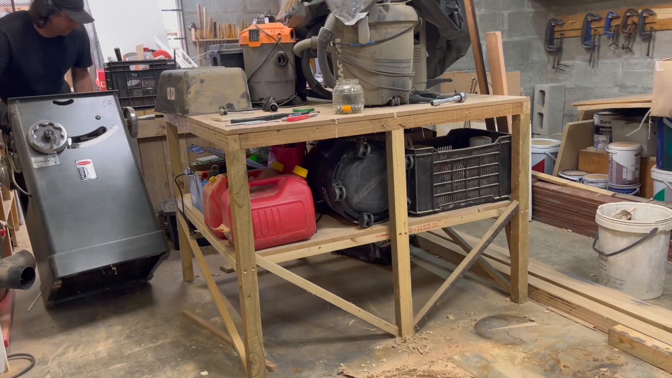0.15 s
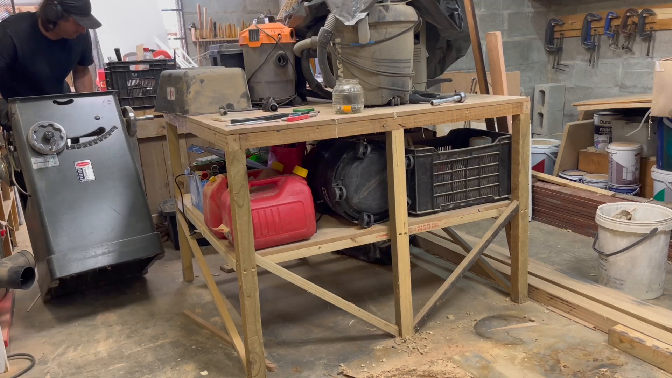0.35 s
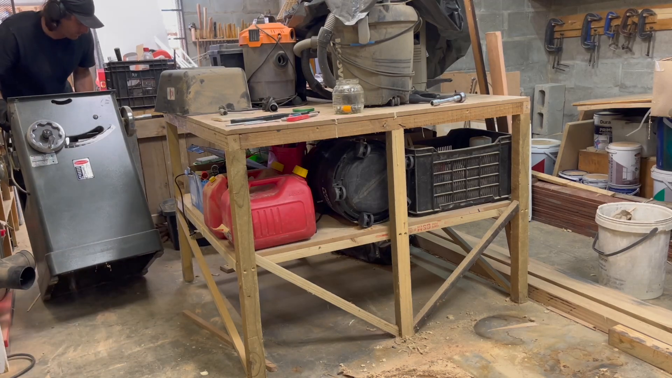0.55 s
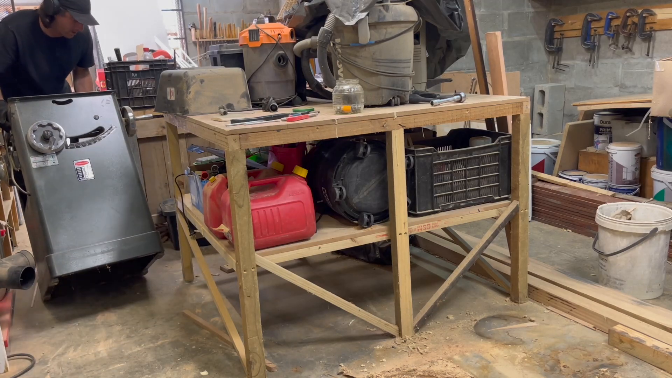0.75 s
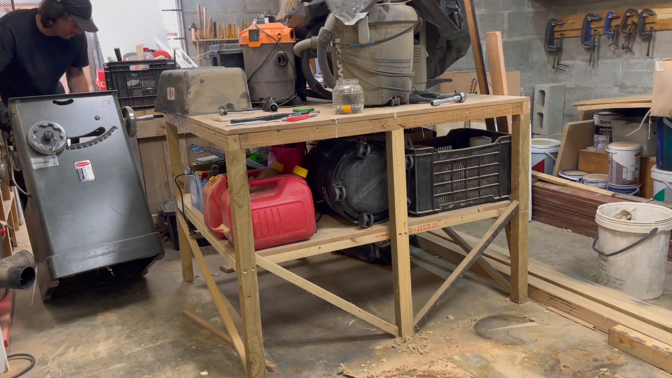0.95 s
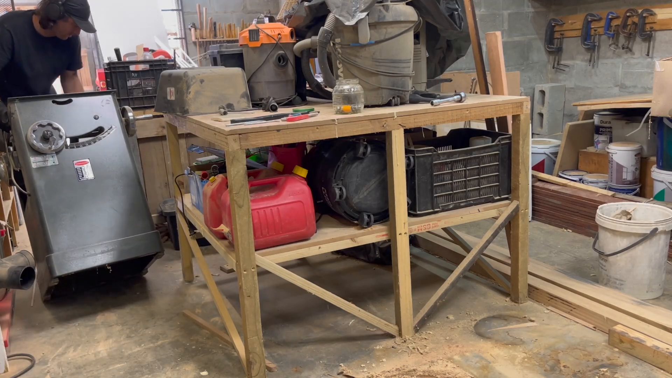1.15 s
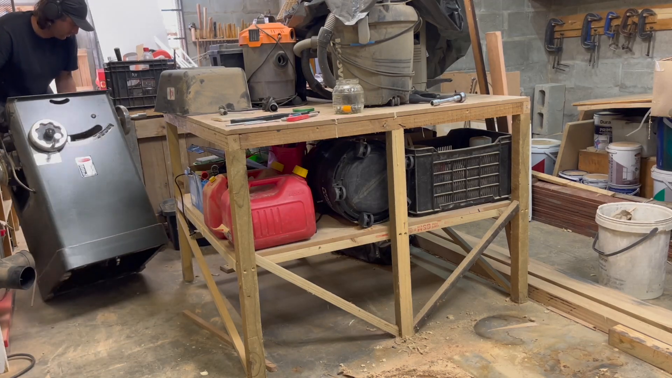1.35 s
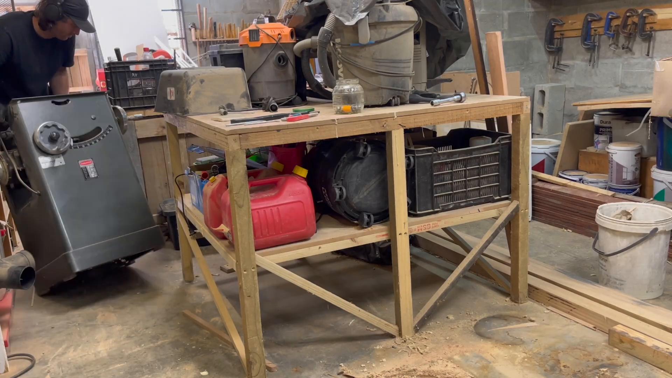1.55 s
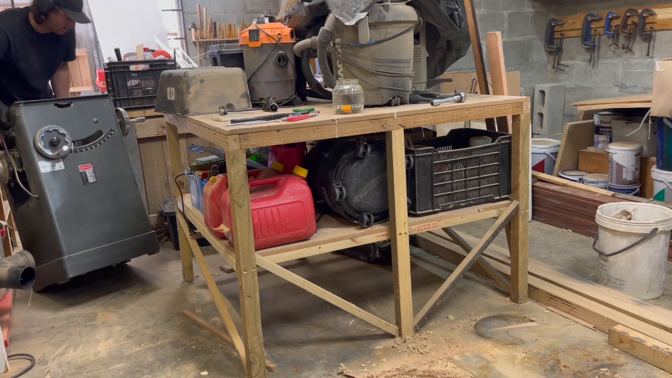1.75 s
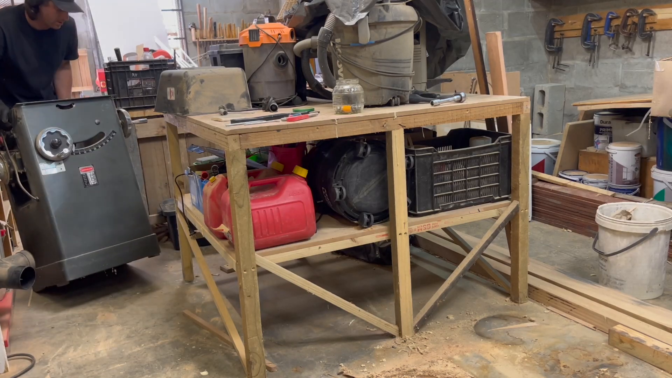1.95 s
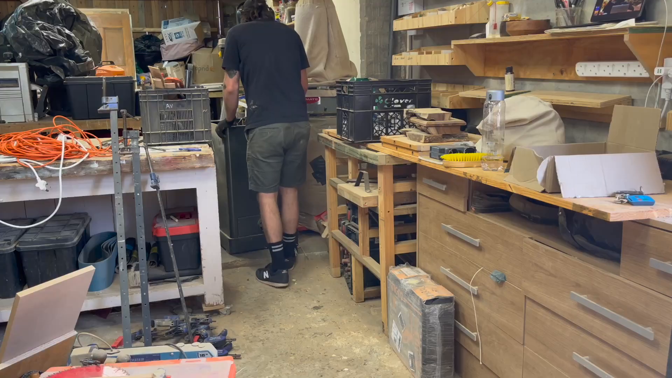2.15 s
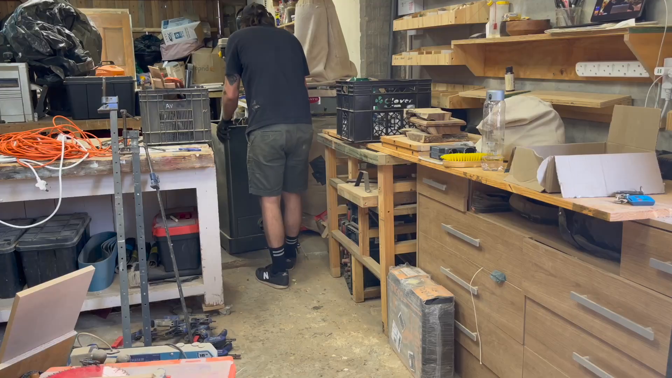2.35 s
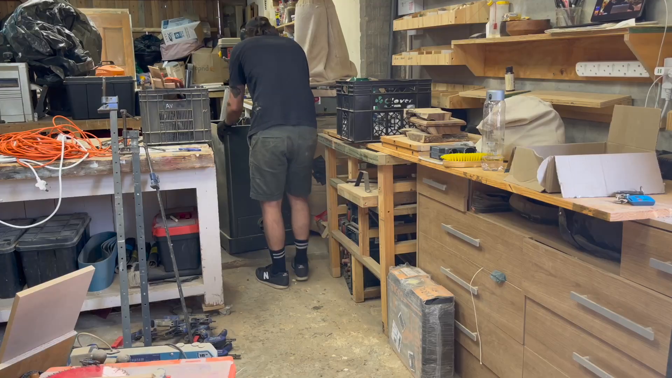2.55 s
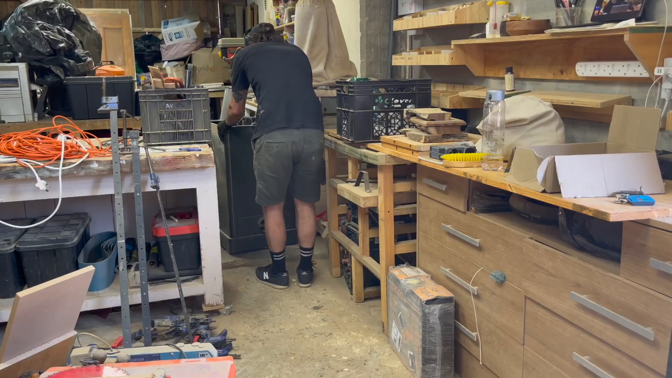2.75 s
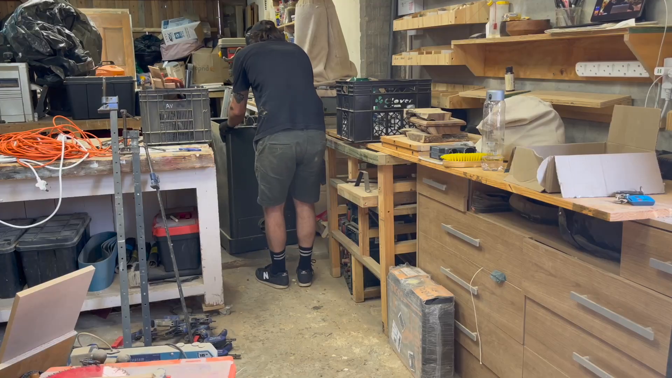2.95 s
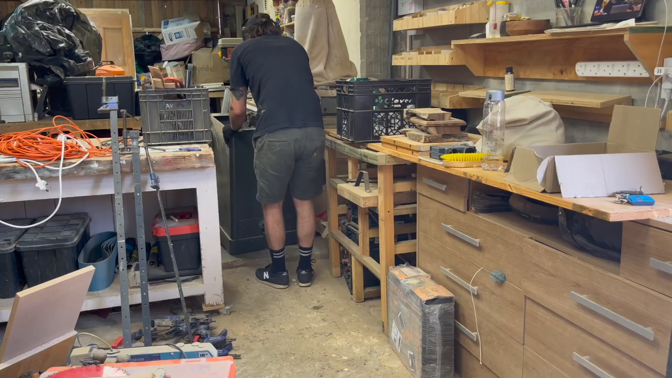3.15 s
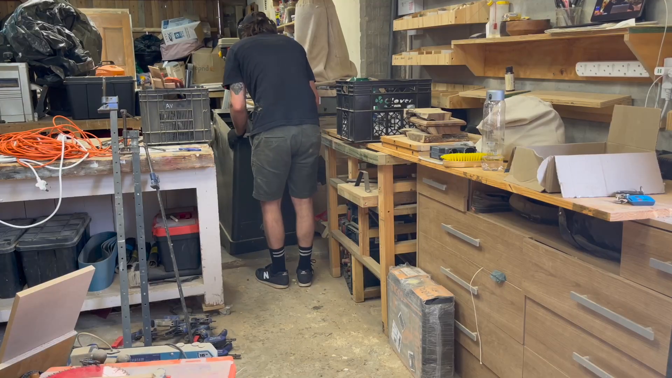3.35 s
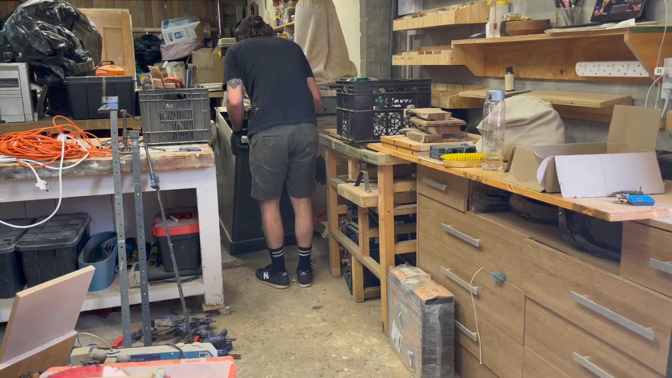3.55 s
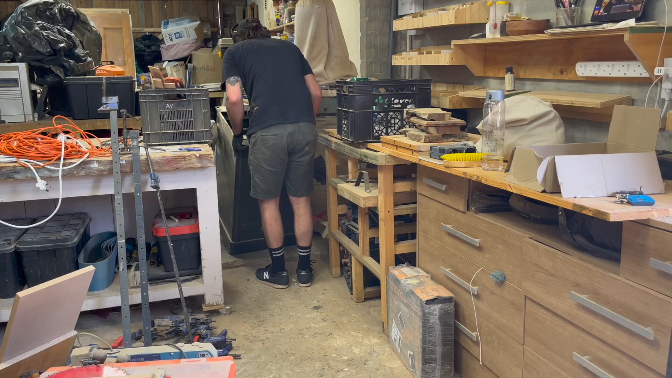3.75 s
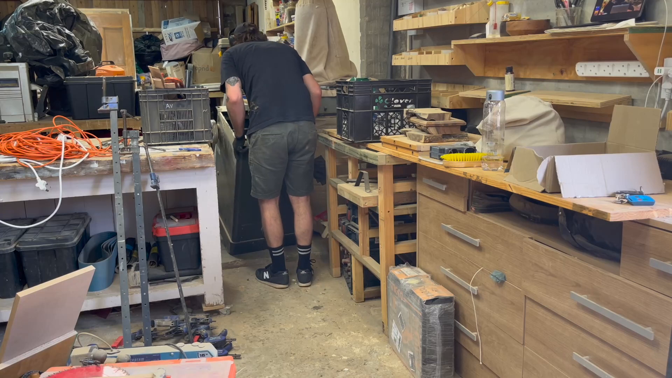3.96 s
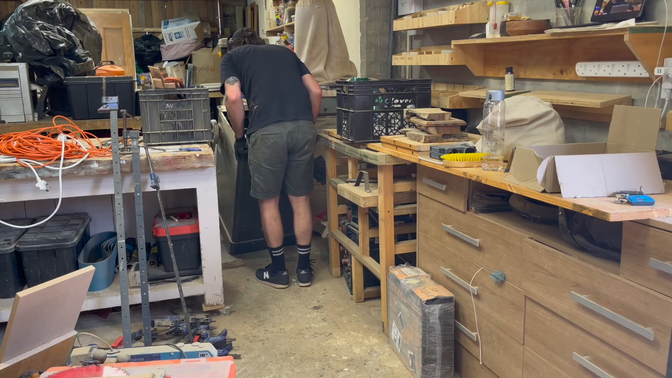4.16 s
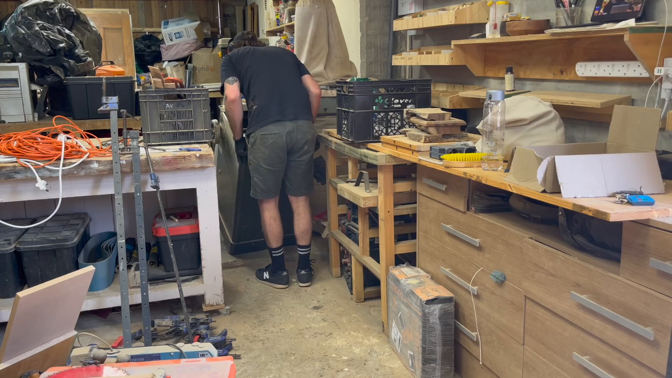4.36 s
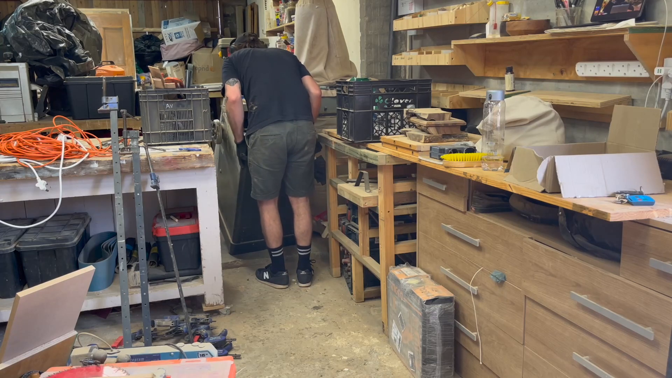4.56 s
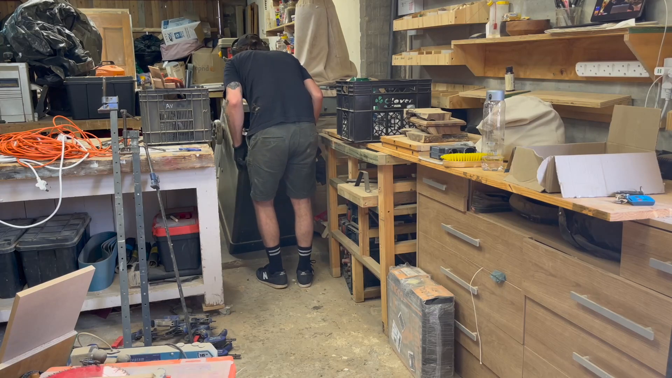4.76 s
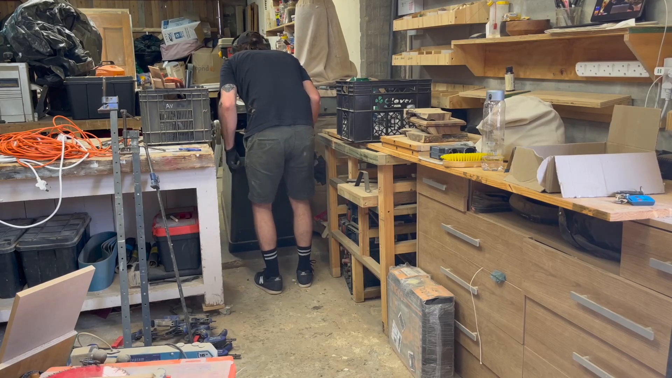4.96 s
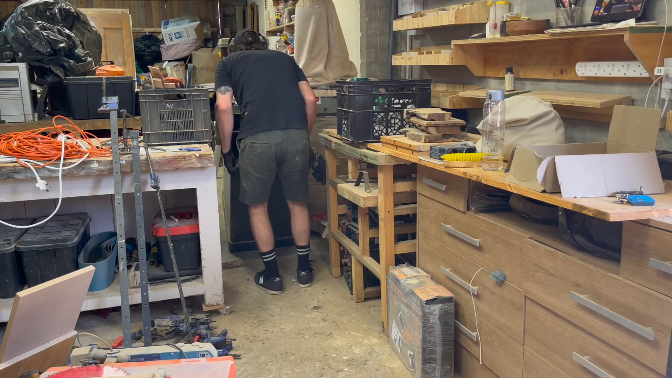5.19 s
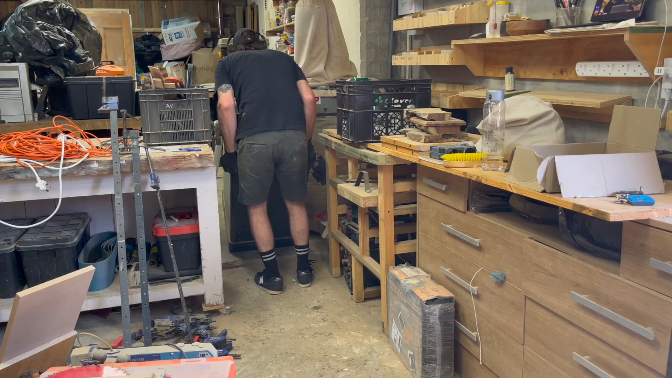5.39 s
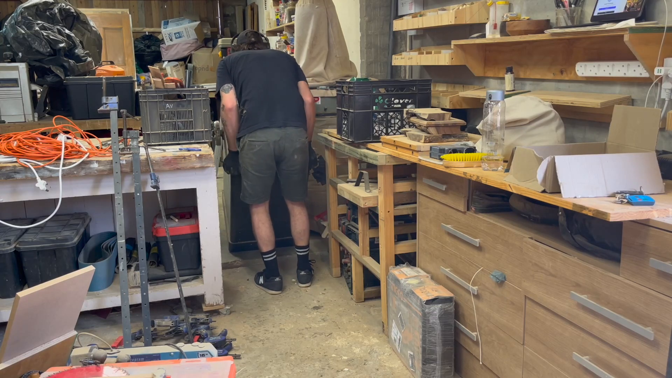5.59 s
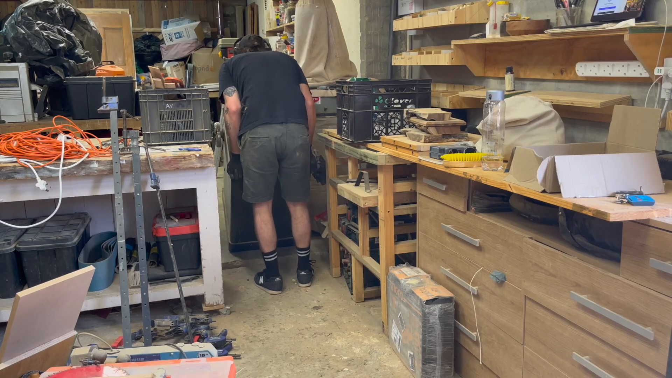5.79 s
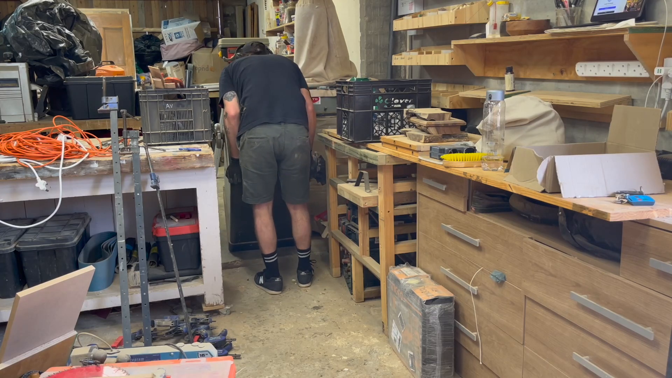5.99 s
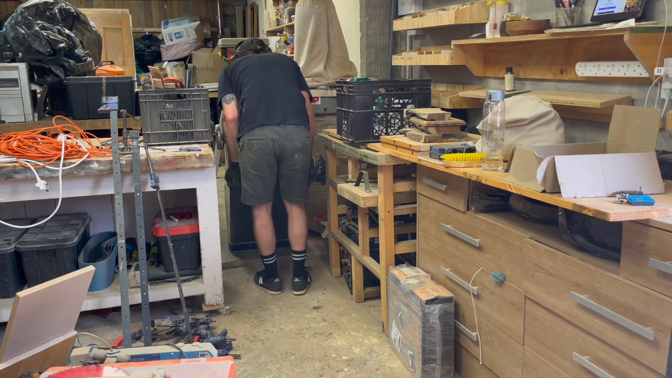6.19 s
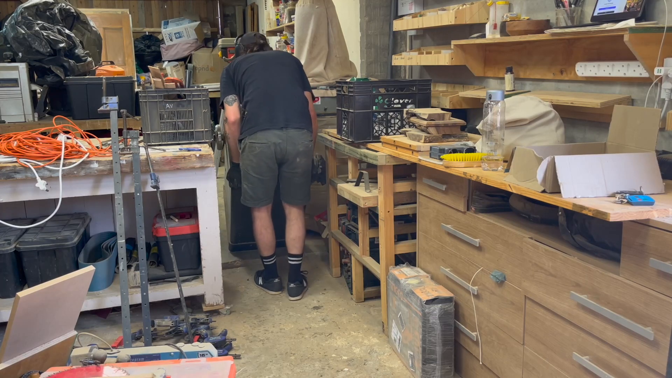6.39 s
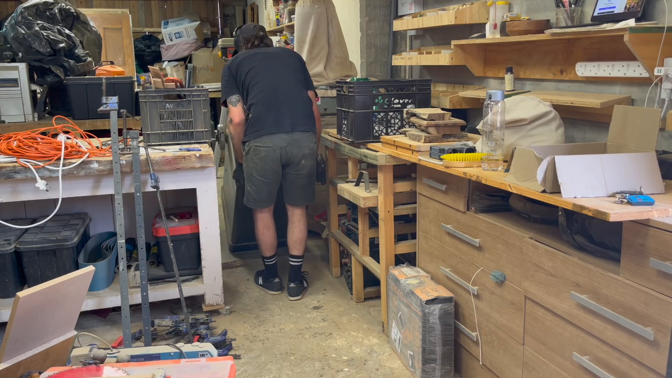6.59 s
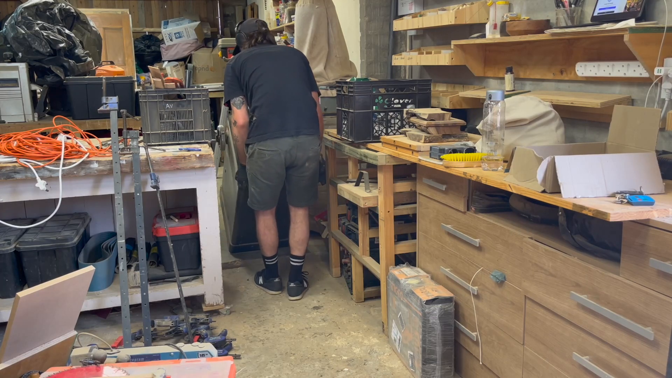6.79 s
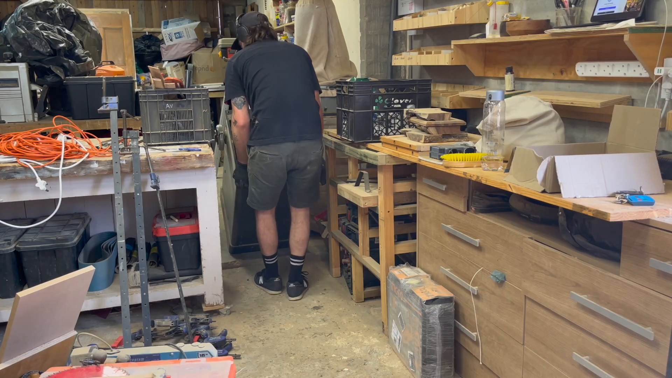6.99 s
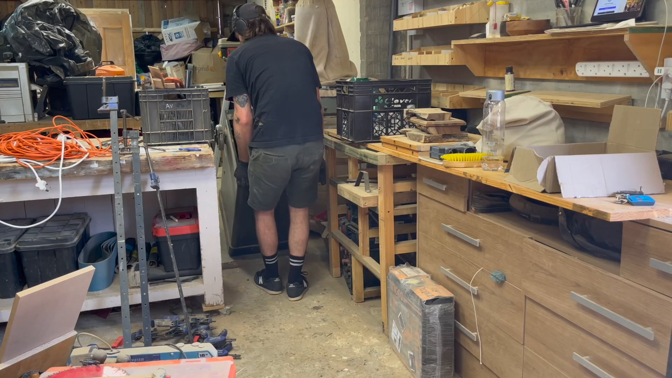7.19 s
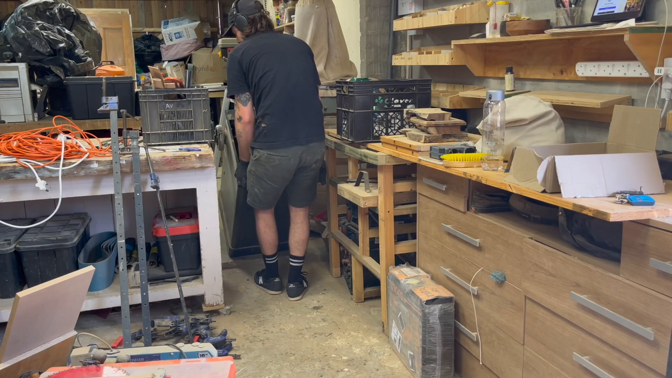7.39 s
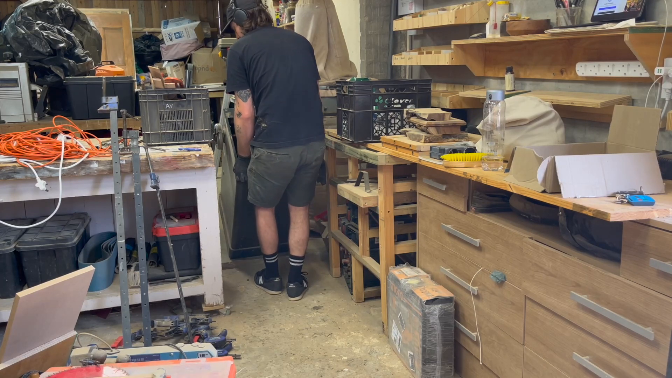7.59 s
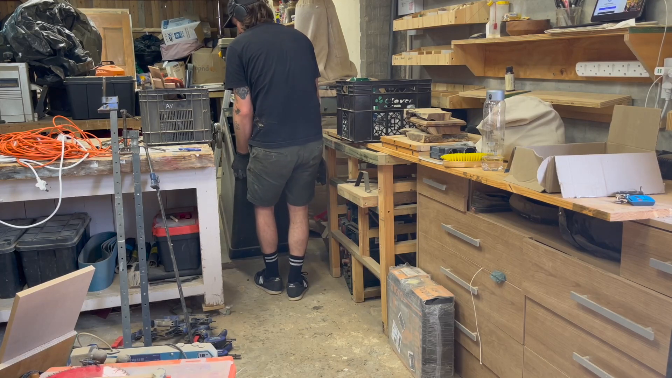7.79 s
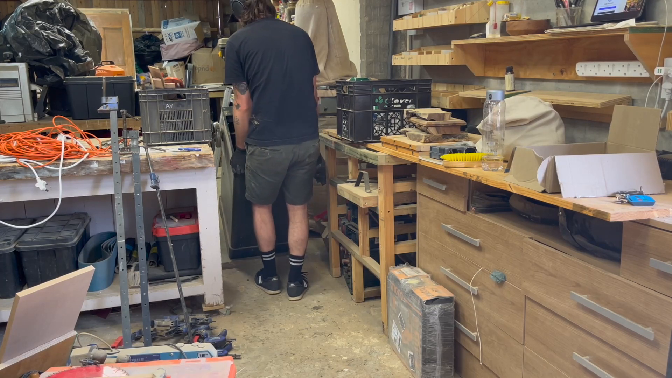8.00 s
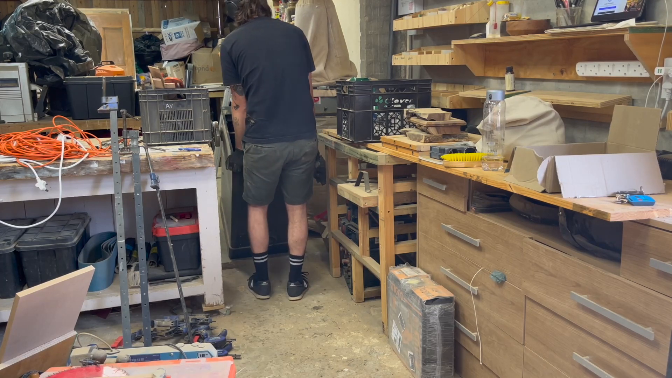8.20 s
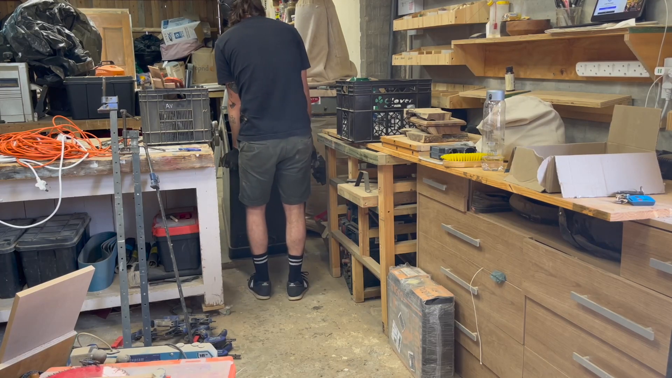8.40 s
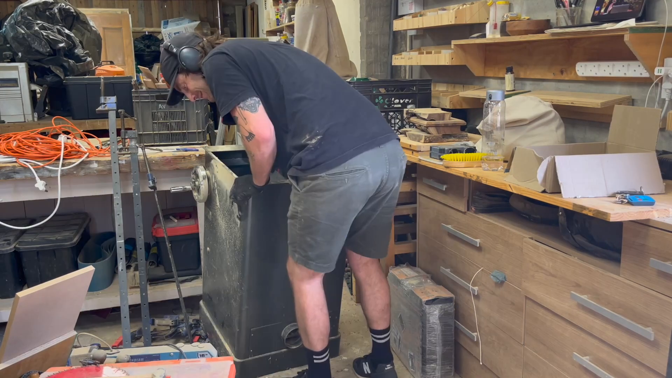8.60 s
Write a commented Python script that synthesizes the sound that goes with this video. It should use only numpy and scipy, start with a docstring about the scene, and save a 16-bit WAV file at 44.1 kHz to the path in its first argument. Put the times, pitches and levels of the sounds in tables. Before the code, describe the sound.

In a small workshop with a short hard echo, two very loud metallic drags on concrete come first, booming, raspy and squealing. After about two seconds everything is much quieter and more distant: a hard clack, a dull thud with shudder, light scrapes, gritty shoe twists, small knocks and cracks, and a last group of scrapes cut off abruptly. Low hum and quiet air lie behind.

```python
"""First, close to the microphone pair, two loud shoves drag a heavy steel-cabinet table saw over concrete.
Then, from further off in the workshop, it is knocked and walked into place in short scrapes, with clacks,
cracking grit and shuffling soles. Random catches of the base excite the cabinet resonances; sines make the
groans, squeals and chirps; short noise bursts make the knocks. A low hum and quiet air lie behind the far place."""
import sys
import numpy as np
from scipy import signal
from scipy.fft import rfft, irfft, next_fast_len
from scipy.io import wavfile
from scipy.ndimage import uniform_filter1d, map_coordinates

SR = 44100
rng = np.random.default_rng(int(sys.argv[2]) if len(sys.argv) > 2 else 0)


def transcribe(u):
    """Save the signal u as a 16-bit wav file named by the first command-line argument.

    u: samples, shape (n,) or (channels, n), limited to [-1, 1]; the rate is SR.
    q: integer samples, one column per channel.
    """
    v = np.clip(np.atleast_2d(u).T, -1, 1)
    q = np.round(v * 32767).astype(np.int16)
    wavfile.write(sys.argv[1], SR, q)


N = 381015
TIME = np.arange(N) / SR  # s
STEPS = np.arange(0, N / SR, .001)  # s, coarse time for envelopes
SIZE = next_fast_len(N + SR)  # transform length with room for tails
HZ = np.fft.rfftfreq(SIZE, 1 / SR)

# Shoves close by, and one gritty shoe scuff at .59 s: (start t/s, rise/s, hold/s, fade to -60 dB/s,
# then level/dB of rumble, panel ring, edge rasp, grit, settling shudder)
NEAR_SHOVES = [(-0.021, 0.01768, 0.06221, 0.5, -27.5, -23, -32.5, -41, -58),
               (.052, .06, 0.13049, 0.7088, -30, -24.5, -24, -32.5, -42.5),
               (.25, .05, 0.05991, .5, -28.5, -25.5, -28, -39, -42),
               (.59, 0.12841, 0.06, 0.5257, -52.5, -66, -56.5, -50, -58),
               (1.253, 0.22, 0.04, 0.5412, -52, -35, -33, -41, -59.5),
               (1.426, 0.15688, 0.10867, 0.5748, -38, -28, -26, -36.5, -31),
               (1.57, .05, .025, .3, -42, -34, -25.5, -36, -45)]
# Shoves further off: (the same columns, t/s and level/dB)
FAR_SHOVES = [(3.385, 0.023755, 0.05111, 0.4025, -40, -56.5, -62, -68, -54),
              (3.485, 0.05, 0.05, 0.8, -44, -55, -63, -67.5, -46),
              (4.66, 0.19, 0.135, 0.6427, -46, -47.5, -50.5, -62, -51),
              (6.861, 0.083, 0.163, 1.5, -47, -47.5, -47, -53.5, -57),
              (7.091, .093, .115, 0.62, -48.5, -44, -44.5, -51.5, -56.5),
              (7.39, .125, .053, 0.8291, -55, -43, -46, -55, -39.5),
              (8.133, 0.09965, 0.0268, 3, -57.5, -58, -59, -57, -59.5),
              (8.3, .22, .065, .5, -48, -46, -47.5, -55, -53)]
# Growth of rumble, panel ring, edge rasp and grit: (dB per dB of push)
BAND_GROWTH = [.62, 1.0, 1.38, 1.42]
# Settling shudder in rumble, panel ring, edge rasp and grit: (relative level/dB)
NEAR_SETTLE_DB = [1, -22.5, -44.5, -35]
FAR_SETTLE_DB = [-0.5, -49, -50, -43.5]
# Edges of those four bands, of which the inner three divide the sound: (f/Hz)
BAND_EDGES = [20, 200, 650, 2500, 11000]
# Cabinet resonances at each place: (f/Hz, width/Hz, level over the slope/dB)
NEAR_MODES = [(78.664, 6.2, 16.5), (145.47, 35, 14), (207, 14, 13), (263.48, 12, 13), (304.72, 6.1, 17),
              (374.6, 15, 12.5), (388.47, 13, 12.5), (447.5, 13, 18), (536.54, 19, 10.5),
              (624.65, 19, 12.5), (758.65, 7.8, 11), (812.86, 14, 13), (897.31, 13, 8.5), (1014.1, 31, 8),
              (1103.6, 14, 9), (1298.7, 28, 10.5), (1650, 30, 7), (2054, 7.1, 5), (2154, 53, 2),
              (4950, 700, 4.5), (7351, 260, 5)]
FAR_MODES = [(148.73, 16.51, 12.233), (216.43, 15.7, 8.016), (325.43, 9.92, 6.66), (398.67, 37.24, 6.137),
             (480.81, 16, 11), (552.46, 18, 12.5), (651.46, 33.64, 4.771), (767.77, 16.71, 11.47),
             (847.2, 15.25, 10.554), (1165.8, 75.66, 7.22), (1345.6, 6.004, 15.891), (1979.3, 28.24, 7.573),
             (4119.7, 89.585, 5.3), (4750, 110, 12.5), (5036.3, 250, 4.4)]
CORNER_MODES = [(145, 26, 13), (212.88, 22, 12), (304.31, 19.94, 11), (331.98, 16, 9), (485.64, 35.09, 7.8),
                (559.32, 30, 9.407), (631.04, 25, 6.6), (748.41, 28.33, 13), (1077, 23.76, 9.364),
                (1270.6, 90, 7), (4800, 390, 2.5)]  # far place, tipped on one corner
# Smooth colour of the scrape under the resonances: (f/Hz, relative level/dB)
NEAR_SLOPE = [(22.0, -42), (50.0, -12), (110.0, -23.5), (235.0, -25.5), (330.0, -16.5), (800.0, -21),
              (1500.0, -16.5), (1900.0, -27), (3500.0, -34.5), (6300.0, -40.5), (8500.0, -40),
              (15000.0, -57)]
FAR_SLOPE = [(22, -32), (52, 5.5), (110, -8.5), (235, -16), (330, -9.5), (800, -19), (1500, -20.5),
             (1900, -25), (3500, -32), (6300, -34.5), (8500, -35), (11000, -39.5), (15000, -50)]
# Steel edge groaning: (start t/s, rise/s, hold/s, fade to -60 dB/s, level/dB)
CHATTER = [(1.283, .013, .06, .15, -31), (1.385, .03, .05, .4, -25), (1.525, .03, .1, .09, -17.5)]
# Friction sets a resonance singing: (centre t/s, length/s, f/Hz, level/dB)
SQUEALS = [(.015, .035, 400, -16), (.07, .06, 362.4, -21), (.116, .025, 445, -18), (.148, .028, 430, -17),
           (.135, .03, 1320, -25), (.202, .02288, 420.5, -19.5), (.255, .06, 1315, -22),
           (.315, .02, 1325, -24), (.364, .02465, 451, -16.5), (1.462, .025, 1319, -24.5),
           (1.491, .03692, 140, -28), (1.5, .024, 1304, -18), (1.503, .016, 445, -21),
           (1.72, .04, 650, -26), (1.74, .07, 1640, -34), (3.492, .07505, 143, -34.5),
           (3.622, .05037, 145, -34), (4.895, .2121, 148.2, -40.5), (6.11, .05, 1200, -50),
           (7.203, .1756, 472, -36.5), (7.3, .0665, 545, -39.5), (8.465, .05, 550, -42),
           (8.54, .05, 400, -42)]
# Cabinet rocks without sliding: (start t/s, rise/s, hold/s, fade to -60 dB/s, level/dB)
ROCKING = [(3.715, .02, 0.07402, 0.0028, -43.5), (6.25, 0.1528, 0.05294, 0.7, -43)]

# Hard clacks and bursting grit, with a click at 8.58 s as the handling is cut short:
# (t/s, level/dB, decay to -60 dB/s)
CLACKS = [(1.211, -58, .0553), (1.232, -45, .1598), (2.411, -46.5, .03), (2.47, -52, .04),
          (2.629, -28.5, .11), (2.652, -37, .05), (4.918, -39.5, .0347), (6.062, -47, .025),
          (6.178, -37.5, .025), (6.228, -41, .02452), (6.34, -38.5, .04), (6.395, -44, .0274),
          (6.576, -36.5, .04), (8.092, -47, .02872), (8.216, -42.5, .1142), (8.58, -33.5, .01273)]
# Colour of a clack: (f/Hz, relative level/dB)
CLACK_SLOPE = [(100, -17), (400, -7), (900, -2), (1500, -2), (3000, -5), (5500, -7), (9000, -12.5),
               (11000, -20.5), (15000, -31.5)]
# Resonances of a clack: (f/Hz, width/Hz, level over the slope/dB)
CLACK_MODES = [(1600, 400, 1.5), (2250, 700, 0), (5100, 510, 3)]
# Single grains cracking under the steel: (t/s, level/dB)
CRACKS = [(4.772, -38), (4.848, -35), (5.022, -37), (5.057, -41), (6.477, -46), (7.04, -40), (7.12, -39),
          (7.815, -48), (8.152, -41), (8.263, -43), (8.523, -41)]
# Colour of a crack: (f/Hz, relative level/dB)
CRACK_SLOPE = [(200, -14), (2000, -6), (6500, -9), (9000, -6.5), (15000, -28)]
# Resonance of a crack: (f/Hz, width/Hz, level over the slope/dB)
CRACK_MODES = [(4850, 300, 11)]
# Dull thuds; the one at 8.579 s is a click at the cut: (t/s, level/dB, decay to -60 dB/s)
THUDS = [(3.39, -24.5, .035), (3.445, -37, 0.0317), (3.585, -42.5, 0.055), (6.578, -39.5, .1),
         (6.872, -50, .03), (6.892, -43, .04), (8.091, -38, .035), (8.579, -17, .012)]
# Colour of a thud: (f/Hz, relative level/dB)
THUD_SLOPE = [(25, -30), (55, -4), (110, -4.5), (235, -7.5), (330, -4), (450, -7), (600, -3), (850, -9),
              (1300, -26), (3000, -36), (10000, -48)]
# A loose steel part clinks: (t/s, level/dB, decay to -60 dB/s)
CLINKS = [(4.391, -39.5, .26), (6.064, -52, .2), (6.342, -48, .15)]
# Colour of a clink: (f/Hz, relative level/dB)
CLINK_SLOPE = [(100, -10), (500, -3.5), (1200, -4.5), (2500, -6.5), (6000, -16), (11000, -21), (15000, -23)]
# Resonances of the loose part: (f/Hz, width/Hz, level over the slope/dB)
CLINK_MODES = [(490, 30, 4), (940, 45, 19.5), (1020, 50, 20), (1233.5, 45, 12), (1351, 45, 16.5),
               (2700, 110, 3), (4800, 110, 17), (8400, 900, 5.717)]

# Shoes shuffle and clothes rustle; a sole twists hard on grit:
# (start t/s, rise/s, hold/s, fade to -60 dB/s, level/dB)
SHUFFLES = [(1.08, .02, .08, 0.2262, -78), (2.11, 0.014, 0.07348, 2.0444, -62.5),
            (2.4, 0.013, 0.04967, 0.5086, -56.5), (3.89, .067, .055, .86, -76),
            (5.02, 0.43716, .02, 0.6586, -62.5), (5.5, 0.1786, 0.10797, 2.5, -61.5),
            (7.795, .025, 0.00523, 0.6769, -56.5), (7.86, 0.044, 0.00985, 2.3812, -64.5)]
SCUFFS = [(6.052, .024, 0.0595, .8, -50), (6.135, 0.04236, 0.0288, 0.4374, -39.5),
          (6.21, 0.03053, 0.01965, 0.2005, -44.5), (6.337, .03, .035, .35, -44)]
# Colour of shuffle and of twist: (f/Hz, relative level/dB)
SHUFFLE_SLOPE = [(150, 0), (400, -1.5), (1400, -2), (1900, -5.5), (4500, -6), (7000, -12.5), (11000, -17),
                 (15000, -28.5)]
SCUFF_SLOPE = [(100, -14), (250, -13), (400, -4), (750, 0), (1400, -1.5), (1700, -6.5), (2200, -5.5),
               (5000, -14), (8500, -19), (11000, -24), (15000, -30.5)]
# A rubber sole squeaks: (centre t/s, length/s, f/Hz, level/dB)
SQUEAKS = [(5.39, 0.08074, 2300, -69), (5.75, .07, 2800, -67.5), (6.536, 0.0157, 1693, -57.5)]

# Low hum, before the trim of each channel: (t/s, f/Hz, level/dB)
HUM = [(2.125, 66.99, -44), (2.9, 70.3, -46.5), (3.9, 71, -50), (4.4, 77.64, -60), (6.2, 78.83, -61)]
# Colour of the still air: (f/Hz, relative level/dB)
AIR_SLOPE = [(25, -27), (55, -3.5), (90, -4), (120, -13.5), (165, -13.5), (240, -21), (400, -26.5),
             (1500, -36), (2300, -44.5), (5000, -48), (15000, -69)]
# Decay of the workshop: (f/Hz, t60/s)
ROOM_DECAY = [(100, 0.52), (800, 0.2), (2100, .27), (5500, .235), (14000, 0.25)]
# Likeness of the two microphones: (f/Hz, correlation)
ALIKE = [(60, .99), (170, .94), (330, .72), (520, .72), (900, .35), (1550, .25), (2050, .82), (2700, .55),
         (3700, .3), (5800, .35), (7500, .75), (8500, .97), (9800, .97), (10700, .6), (11900, .98),
         (13600, .98), (14400, .5), (15300, .85)]
# How each place reaches the pair: (f/Hz, left minus right level/dB, left leads/rad)
NEAR_SIDE = [(60, -4, 0), (170, -4, .2), (340, -2.5, .8), (690, 2, 1), (1380, 2.3, 2), (1750, 1.5, 5.6),
             (2200, 2, 6.7), (2800, .5, 7.6), (3600, 3, 7.9), (4300, 7, 6.2), (5300, 3, 6), (5900, 1, 4),
             (6800, 0, 3.2), (7500, -1, 1.2), (8350, 0, 0), (10000, 0, 0), (11700, 0, -3.1),
             (14000, 0, -3.1), (15000, 0, -6.3)]
FAR_SIDE = [(60, -6.5, .3), (348, -3.8, .1), (840, .3, 1.1), (1300, 1, .7), (1600, 1.5, -.4),
            (2300, .5, .3), (3700, 2.5, 1), (5000, 6, .2), (6440, 2, -2.7), (7300, -1.5, -4.8),
            (8400, 0, -6.3), (9700, 0, -6.3), (12000, 0, -9.4), (13600, 0, -9.4), (15000, 0, -12.5)]

RISE_DB = 21.5  # a push builds up by this much, quickly at first
SETTLE_RISE_S, SETTLE_FADE_S = 0.11, 1.7  # shudder after each push
CHATTER_HZ = 443.6  # slips a second
CRACK_S = .025  # decay to -60 dB
MOVE_S, FLAT_S = 2.125, 5.4  # listening place becomes far; base slides flat
CUT_S, CUT_DB = 8.583, 16  # the handling is cut short, and the drop in level
TOP_HZ = 15600  # band limit


def near_drag():
    """Close by: shoves on the full edge of the base and a gritty scuff, all from dense catches on concrete."""
    force = catches(rate=7000, scatter_db=2, judder_db=1.3, judder_rate=170)
    force = wander(force, depth_db=2.9, grain_hz=60, rate=20)
    cabinet = filtered(force, body(NEAR_SLOPE, NEAR_MODES))
    levels = shove_levels(NEAR_SHOVES, NEAR_SETTLE_DB)
    return (1 - moved()) * drag(levels, cabinet, NEAR_SIDE, wet_db=7)


def far_drag():
    """Further off: lighter scrapes, tipped on one corner, which rings differently, then flat on the base."""
    force = catches(rate=4500, scatter_db=1.8, judder_db=0.6263, judder_rate=51)
    force = wander(force, depth_db=3, grain_hz=70, rate=21)
    # on the corner, the deepest shudder is lost after 4.4 s
    lifted = filtered(force, 1 / (1 + (105 / (HZ + 1)) ** 3))
    corner_force = np.where(TIME > 4.4, lifted, force)
    corner = filtered(corner_force, body(FAR_SLOPE, CORNER_MODES))
    flat = filtered(force, body(FAR_SLOPE, FAR_MODES))
    cabinet = np.where(TIME < FLAT_S, corner, flat)
    levels = shove_levels(FAR_SHOVES, FAR_SETTLE_DB)
    return drag(levels, cabinet, FAR_SIDE, wet_db=7.5)


def drag(levels, dry, side, wet_db):
    """Friction rings the cabinet, shared by the push among rumble, panels, edge and grit."""
    treble = 1 / (1 + (1500 / (HZ + 1)) ** 4)
    # as the cabinet travels, two patterns of reflections trade places 2.3 times a second
    shift = (1 + np.sin(2 * np.pi * 2.3 * TIME)) / 2
    echoing = np.sqrt(shift) * room(dry, wet_db) + np.sqrt(1 - shift) * room(dry, wet_db)
    # the bass stays dry
    mixed = dry + filtered(echoing - dry, treble)
    ring = rfft(spread(mixed, side), SIZE)
    below = [0] + [1 / (1 + (HZ / hz) ** 8) for hz in BAND_EDGES[1:-1]] + [1]
    out = 0
    for k, level in enumerate(levels):
        band_gain = np.sqrt(np.abs(below[k + 1] - below[k]))
        part = irfft(ring * band_gain, SIZE)[:, :N]
        # the steady push evens out the friction over a few judders
        power = uniform_filter1d(part.mean(0) ** 2, size=SR // 14)
        out = out + part / np.sqrt(np.abs(power) + 1e-20) * level
    return out


def shove_levels(shoves, settle_shares_db):
    """Treble needs the hardest push; the bass outlasts it as the cabinet sinks back and shudders."""
    power = np.zeros((4, len(STEPS)))
    for start, rise, hold, fade, *tops_db, settle_db in shoves:
        push = stroke(start, rise, hold, fade)
        shudder = amp(settle_db) * stroke(start + rise + hold, SETTLE_RISE_S, 0, SETTLE_FADE_S)
        for k in range(4):
            pushed = amp(tops_db[k]) * push ** BAND_GROWTH[k]
            settling = amp(settle_shares_db[k]) * shudder
            power[k] += pushed ** 2 + settling ** 2
    return [np.interp(TIME, STEPS, level) for level in np.sqrt(power)]


def catches(rate, scatter_db, judder_db, judder_rate):
    """Rough contact catches at random moments (rate/s); judder makes the strength swell and sink."""
    caught = rng.random(N) < rate / SR
    sizes = amp(scatter_db * rng.standard_normal(N) + judder_db * wobble(judder_rate))
    return caught * sizes * rng.standard_normal((2, N))


def wander(x, depth_db, grain_hz, rate, size=1024):
    """The contact point travels, favouring now one resonance, now another, with little change in the bass."""
    hz, t, z = signal.stft(x, SR, nperseg=size)
    where = np.meshgrid(np.sqrt(hz / grain_hz) * 8, t * rate, indexing="ij")
    field = map_coordinates(rng.standard_normal((256, 512)), where, mode="wrap")
    depth = depth_db * hz[:, None] / (hz[:, None] + 350)
    return signal.istft(z * amp(depth * field), SR, nperseg=size)[1][:, :N]


def chatter():
    """Close by, the steel edge sticks and slips near a panel resonance: an unsteady groan of three harmonics."""
    phase = slipping(CHATTER_HZ, jitter=0.012)
    groan = np.sin(phase) + amp(-17.5) * np.sin(2 * phase) + amp(-22.0) * np.sin(3 * phase)
    flutter = amp(1.5 * wobble(70))
    return spread(flutter * strokes(CHATTER) * groan * [[1], [0]], NEAR_SIDE)


def squeals():
    """Friction briefly sets single resonances singing: sines that swell and sink, sharing one jitter."""
    out, cycle = np.zeros(N), slipping(1, jitter=0.016)
    for s, length, hz, db in SQUEALS:
        near = np.abs(TIME - s) < 2 * length
        swell = np.exp(-(2 * (TIME[near] - s) / length) ** 2)
        out[near] += amp(db) * swell * np.sin(hz * cycle[near])
    return out * amp([[.5], [0]])  # left, right dB


def knocks():
    """Clacks, cracking grit, dull thuds and clinks: bursts through different bodies."""
    clacks = blows(CLACKS, body(CLACK_SLOPE, CLACK_MODES), wet_db=6.5)
    timed_cracks = [(s, db, CRACK_S) for s, db in CRACKS]
    cracks = blows(timed_cracks, body(CRACK_SLOPE, CRACK_MODES), wet_db=3)
    thuds = blows(THUDS, body(THUD_SLOPE, CORNER_MODES), wet_db=2.5)
    clinks = blows(CLINKS, body(CLINK_SLOPE, CLINK_MODES), wet_db=-8)
    return clacks + cracks + thuds + clinks


def blows(rows, response, wet_db):
    """Each burst is noise that builds quickly and dies, heard through a body and the room."""
    force, t = np.zeros(N + SR), np.arange(SR // 4) / SR
    for s, db, length in rows:
        attack = np.minimum(t / 0.0024 + 0.24, 1)
        force[round(s * SR):][:len(t)] += amp(db - 60 * t / length) * attack
    colour = response / np.sqrt(np.mean(np.abs(response) ** 2))
    rattle = force[:N] * rng.standard_normal((2, N))
    return spread(room(filtered(rattle, colour), wet_db), FAR_SIDE)


def rocking():
    """The cabinet rocks on its feet: shifting weight stirs mainly the lowest resonances."""
    low_body = body(FAR_SLOPE, FAR_MODES) / (1 + (HZ / 170) ** 2)
    shudder = filtered(rng.standard_normal(N), low_body)
    return strokes(ROCKING) * unit(shudder) * amp([[-3], [2.5]])  # left, right dB


def shuffle():
    """Soles scuff on dust and cloth rubs: sparse grains, coloured and swelling unevenly."""
    grit = catches(rate=6000, scatter_db=1.5, judder_db=1.5, judder_rate=110)
    dust = spread(wander(grit, depth_db=3.2, grain_hz=200, rate=25, size=512), FAR_SIDE)
    twist = unit(filtered(room(dust, wet_db=-3.5), body(SCUFF_SLOPE)))
    rustle = unit(filtered(room(dust, wet_db=3), body(SHUFFLE_SLOPE)))
    return strokes(SHUFFLES) * amp(1.2 * wobble(22)) * rustle + strokes(SCUFFS) * twist


def squeaks():
    """Rubber slips on the floor in a brief chirp, rough because its rate is unsteady."""
    out = 0
    for s, length, hz, db in SQUEAKS:
        swell = np.exp(-(2 * (TIME - s) / length) ** 2)
        out = out + amp(db) * swell * np.sin(slipping(hz, jitter=.1))
    return room(np.array([out, out]), wet_db=2)


def background():
    """At the far place a wavering hum with one overtone joins the still air, shaped noise that rises a little."""
    hz, db = curves(HUM)
    phase = 2 * np.pi * np.cumsum(hz + 0.5697 * wobble(11)) / SR
    tone = np.sin(phase) + amp(-19.0) * np.sin(2 * phase)
    hum = amp(db + 0.73 * wobble(12)) * tone * amp([[-.5], [5.5]])  # left, right dB
    air = unit(spread(filtered(rng.standard_normal((2, N)), body(AIR_SLOPE)), FAR_SIDE))
    return moved() * hum + amp(-62 + 3.134 * moved()) * air


def room(x, wet_db):
    """Adds the workshop's short tail: noise that dies at a different speed in each band."""
    hz, t, z = signal.stft(rng.standard_normal((2, SR // 2)), SR, nperseg=256)
    decay = amp(-60 * t / along(ROOM_DECAY, hz)[:, None])
    tail = signal.istft(z * decay, SR, nperseg=256)[1]
    echo = signal.fftconvolve(x, tail / np.linalg.norm(tail[0]), axes=1)[:, :N]
    return (x + amp(wet_db) * echo) / np.hypot(1, amp(wet_db))


def spread(pair, side):
    """Places two signals before the microphone pair by likeness, level and phase at each frequency."""
    turn = np.arccos(np.clip(along(ALIKE), -1, 1)) / 2
    mid, wide = rfft(pair, SIZE) * [np.cos(turn), np.sin(turn)]
    balance = along([(hz, db) for hz, db, _ in side])
    lead = along([(hz, radians) for hz, _, radians in side])
    lean = amp(balance / 2) * np.exp(.5j * lead)
    return irfft(np.array([(mid + wide) * lean, (mid - wide) / lean]), SIZE)[:, :N]


def moved():
    """Zero at the near listening place, one at the far one."""
    return np.clip((TIME - MOVE_S) / 0.01196, 0, 1)


def cut_short():
    """The handling sounds are cut short, dropping 16 dB within 3 ms."""
    return amp(-CUT_DB * np.clip((TIME - CUT_S) / .003, 0, 1))


def stroke(start, rise, hold, fade):
    """Amplitude of one push at each time step: it builds up, holds, and dies away."""
    t = STEPS - start
    building = RISE_DB * np.clip(1 - t / rise, 0, 1) ** 2
    dying = 60 * np.maximum(t - rise - hold, 0) / fade
    return amp(-building - dying) * np.clip(t / 0.0041, 0, 1)


def strokes(rows):
    """Joint amplitude of a table of pushes, adding their powers, one value per sample."""
    power = sum((amp(db) * stroke(*shape)) ** 2 for *shape, db in rows)
    return np.interp(TIME, STEPS, np.sqrt(power))


def slipping(hz, jitter):
    """Phase/rad of a stick-slip cycle with an unsteady rate."""
    return 2 * np.pi * np.cumsum(hz * (1 + jitter * wobble(220))) / SR


def body(slope, modes=(), size=16384):
    """Causal (minimum-phase) response of resonances standing on a smooth slope."""
    f = np.fft.rfftfreq(size, 1 / SR)
    power = 1 + sum(amp(db) ** 2 / (1 + (2 * (f - hz) / width) ** 2) for hz, width, db in modes)
    # folding the cepstrum puts the energy as early as it can be
    cepstrum = irfft(np.log(amp(along(slope, f)) * np.sqrt(power)))
    cepstrum[1:size // 2] *= 2
    cepstrum[size // 2 + 1:] = 0
    return rfft(irfft(np.exp(rfft(cepstrum))), SIZE)


def filtered(x, response):
    """x through a frequency response."""
    return irfft(rfft(x, SIZE) * response, SIZE)[..., :N]


def wobble(rate, count=6):
    """A smooth random curve, rate knots a second."""
    knots = rng.standard_normal(int(N * rate / SR) + 4)
    steps = np.arange(len(knots) * count) / count
    return np.interp(TIME * rate, steps, map_coordinates(knots, [steps]))


def curves(rows):
    """One value per sample for each column after the time."""
    s, *cols = np.transpose(rows)
    return [np.interp(TIME, s, c) for c in cols]


def along(points, hz=HZ):
    """Interpolates (f/Hz, value) points on a log frequency axis."""
    f, v = np.transpose(points)
    return np.interp(np.log(hz + 1), np.log(f + 1), v)


def amp(db):
    """Amplitude factor of a level in dB."""
    return 10 ** (np.asarray(db) / 20)


def unit(x):
    """x scaled to an RMS of one."""
    return x / np.sqrt(np.mean(x ** 2) + 1e-20)


def scene():
    """Both places together; the final cut dims only the far drag, knocks and shuffle."""
    handling = cut_short() * (far_drag() + knocks() + shuffle())
    return near_drag() + chatter() + handling + rocking() + squeals() + squeaks() + background()


def record(dry):
    """The microphone pair keeps nothing above the band limit."""
    return filtered(dry, HZ < TOP_HZ)


dry = scene()
out = record(dry)
transcribe(out)
```